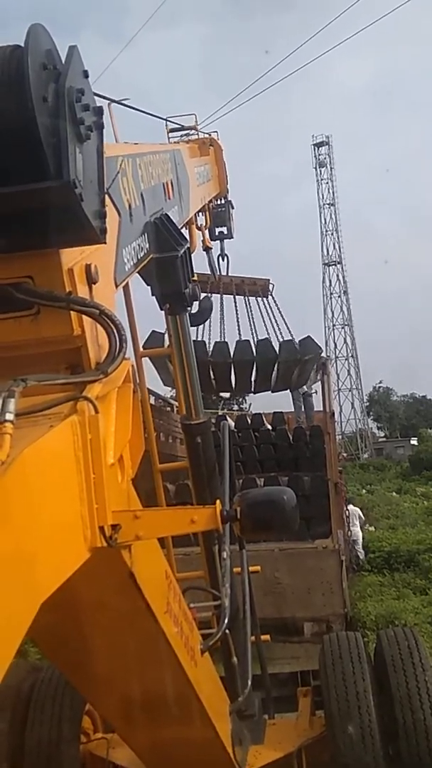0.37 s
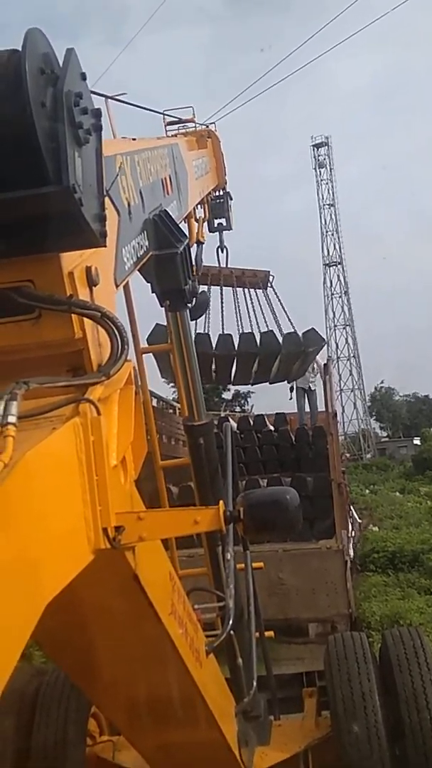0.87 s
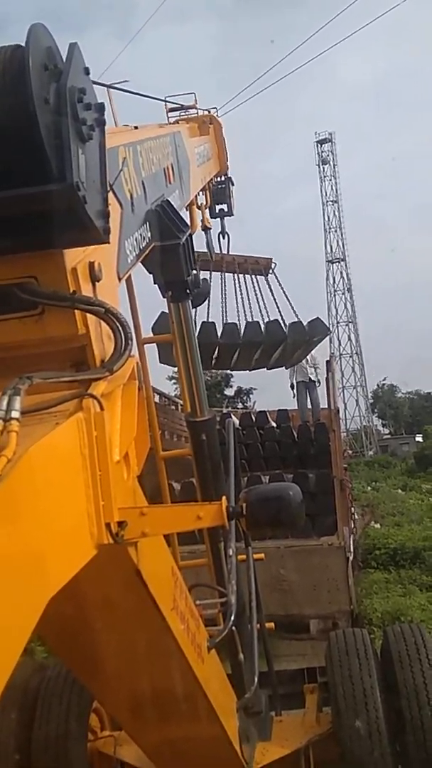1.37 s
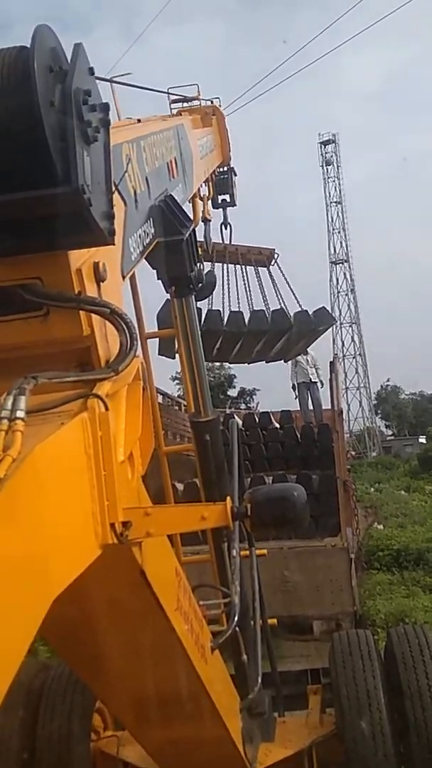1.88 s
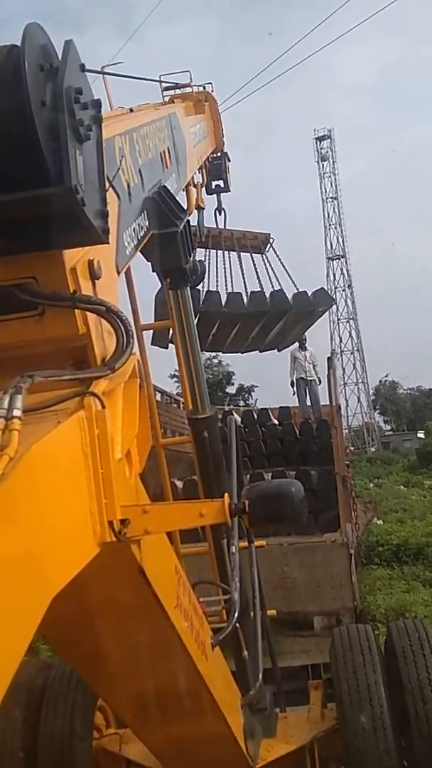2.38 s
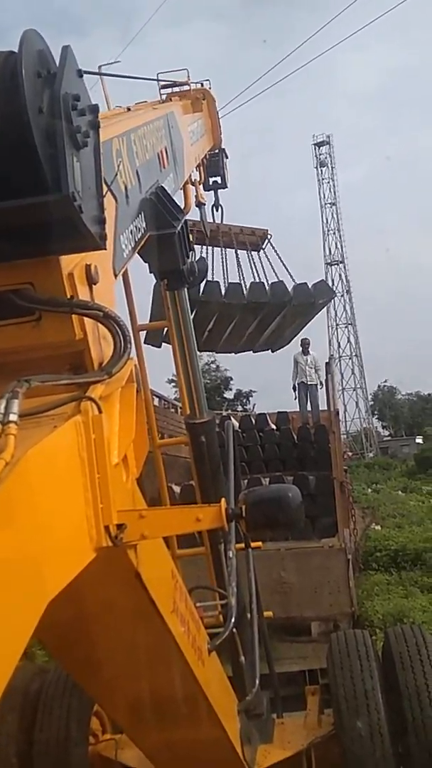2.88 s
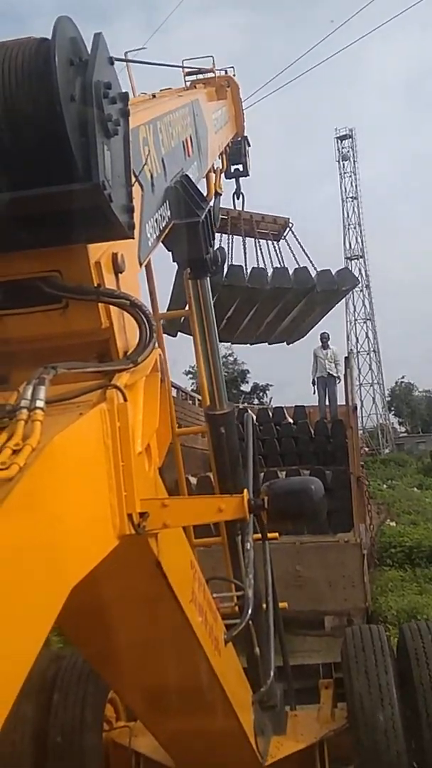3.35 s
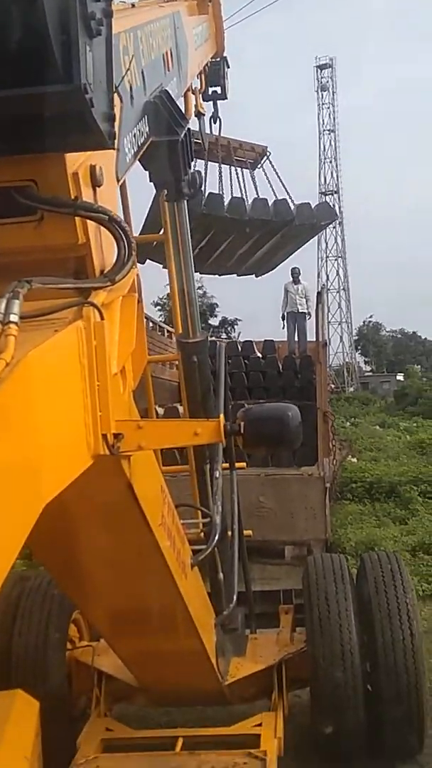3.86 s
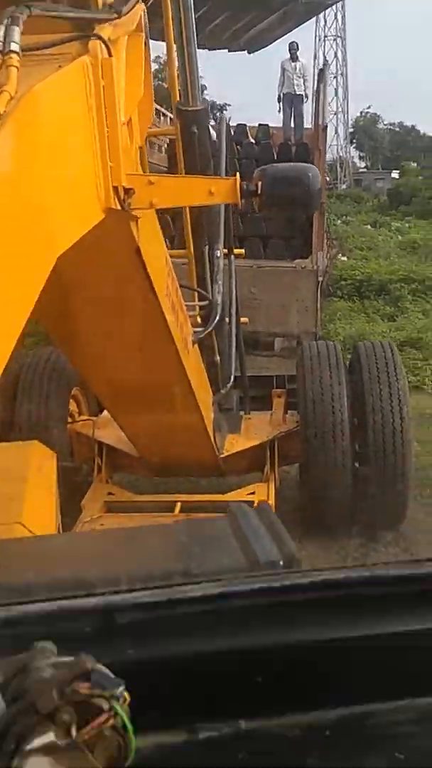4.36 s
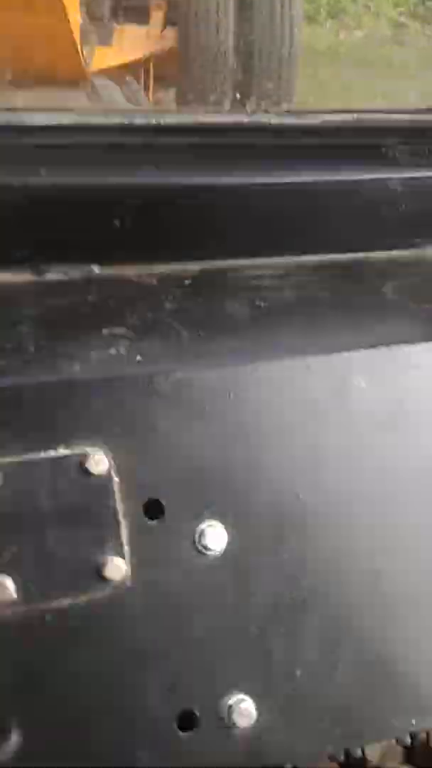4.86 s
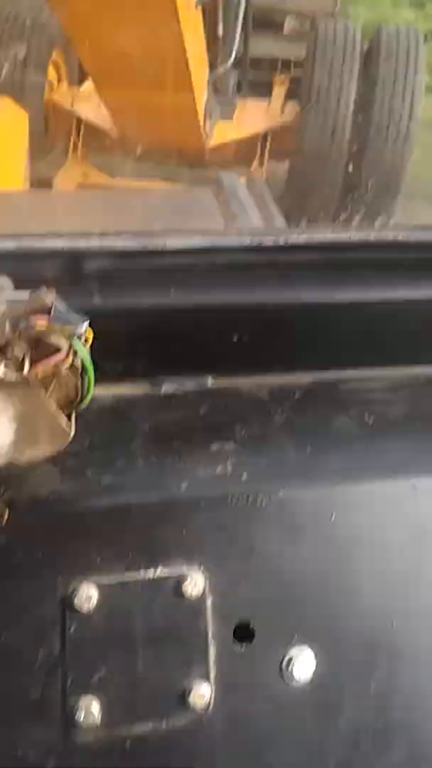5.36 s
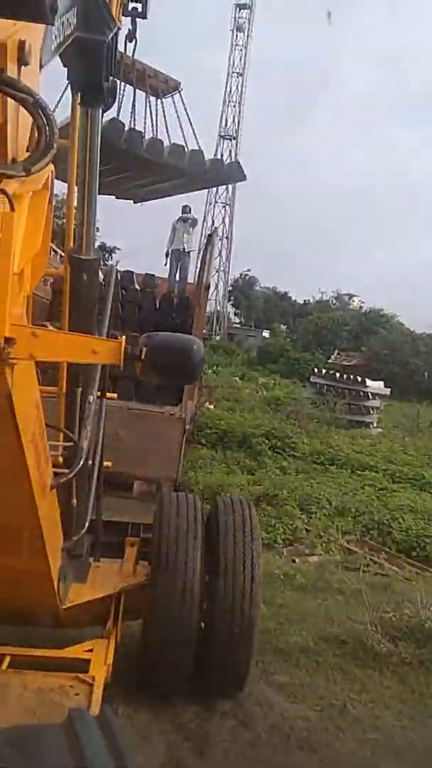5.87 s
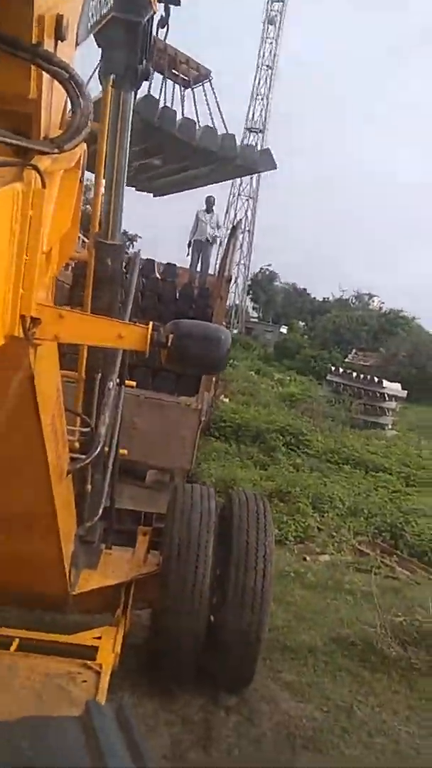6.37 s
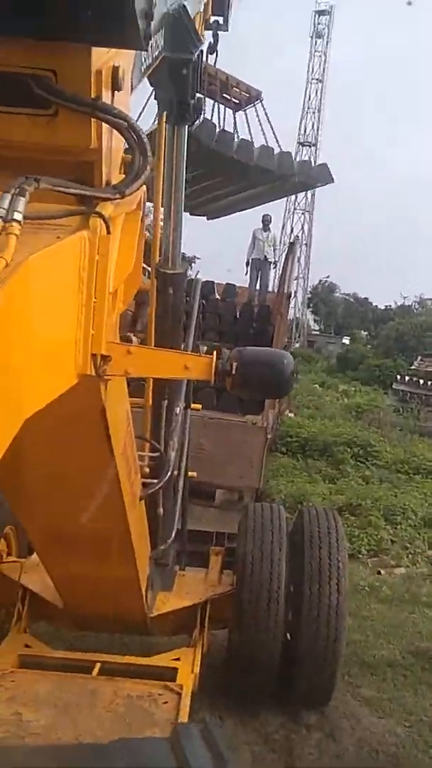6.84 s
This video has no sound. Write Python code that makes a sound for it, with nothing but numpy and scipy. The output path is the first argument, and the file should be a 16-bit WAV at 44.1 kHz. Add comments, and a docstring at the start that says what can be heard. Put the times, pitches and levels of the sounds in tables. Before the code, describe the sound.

Inside a working crane's cab, captured by a handheld stereo microphone. From 0 to 2.1 s a four-cylinder diesel runs loud and nearly constant at high revs: a dense low drone near 50 and 100 Hz, throbbing broadband roar, rattling panels and a hydraulic pump whine. At 2.1 s it eases slightly, then from 2.6 s the pitch plunges with a cab shudder, treble fading first, a clunk at 3.0 s, nearly stalling by 3.4-3.7 s into faint, separate knocks and tiny squeaks. Around 4.0-4.3 s bright air hisses burst out with thin high whistles, over a low thump; a cluster of metallic lever clunks follows at 4.3 s. The engine settles into a slow, soft, uneven clattering idle, rising slightly towards the end. Small squeaks near 5 s, a hard tick at 5.1 s, microphone scuffs and occasional panel bumps continue, with fine ticks around 6.2 s, until 7.2 s.

```python
"""A four-cylinder diesel crane works at high revs, drops to near stall and settles to a ticking idle, heard in the cab.
Engine: sine orders, block modes knocked by each firing, a chuff, shaken cab panels and throbbing broadband roar.
Gear pump: three near-sine tones, louder where they cross pipe and panel resonances.
Events: air hisses and whistles, lever clunks, ticks and squeaks of small parts, friction on the microphone.
The microphone is hand-held and has two ports, unequal in colour and arrival time."""
import sys
import numpy as np
from scipy import signal
from scipy.fft import rfft, irfft, next_fast_len
from scipy.io import wavfile

SR = 44100
rng = np.random.default_rng(int(sys.argv[2]) if len(sys.argv) > 2 else 0)


def attenuation_scalar(level_db):
    """Turn a level in dB into a linear amplitude multiplier (20 dB per decade)."""
    decades = np.asarray(level_db, float) / 20
    return 10 ** decades


def wav_out(sig):
    """Save sig, one row per channel (or a flat mono array), as 16-bit PCM at SR to the path in sys.argv[1]."""
    wavfile.write(sys.argv[1], SR, np.round(np.clip(np.atleast_2d(sig).T, -1, 1) * 32767).astype(np.int16))


N = 318841
TIME_S = np.arange(N) / SR

# engine speed: (time [s], firing rate [1/s])
FIRING_RATE = [(0, 52.05), (0.9, 52.38), (1.5, 52.35), (2.12, 52.15), (2.3, 50.6), (2.5, 50.1),
               (2.58, 48.5), (2.63, 45), (2.87, 33.8), (3.1, 27.6), (3.25, 23.0), (3.4, 14.76), (3.6, 11.0),
               (3.9, 13.51), (4.3, 16.26), (5.1, 15.99), (5.5, 18.25), (6.9, 18.3), (7.23, 20.13)]
WORKING_FIRINGS_PER_S = 52
# engine load as level of its orders: (time [s], level [dB])
ORDER_LOAD = [(0, -17), (2.1, -16.5), (2.25, -21), (2.56, -19.5), (2.63, -27), (3.05, -43), (3.3, -52.5),
              (3.5, -84)]
# strong engine tones: (multiple of firing rate [-], level re load [dB])
ENGINE_ORDERS = [(1, 2), (3, -24), (3.25, -7), (4, -12.5), (6, -6.5), (6.5, -20), (7, -0.5), (8, -16.5),
                 (9, -24.5), (9.5, -17.5), (11.75, -28), (12.25, -21.5)]
# exhaust boom at twice the firing rate: ceiling, and lead over the load below it
BOOM_MAX_DB, BOOM_OVER_LOAD_DB = -12.5, 8
# unequal cylinders, mean level of the other quarter orders: (multiple of firing rate [-], level re load [dB])
UNEVEN_ORDERS = [(.75, -39), (1.25, -16.5), (2.75, -15), (3.6, -21.5), (6.5, -16.5), (9, -27.5), (13, -49)]
UNEVEN_SPREAD_DB = 4.5

# gear pump tones: (multiple of firing rate [-], relative level [dB])
PUMP_TONES = [(5, 2.5), (10, -2.5), (15, -15)]
# pipes and panels set ringing by a passing pump tone: (centre [Hz], half width [Hz], level at centre [dB])
PUMP_RESONANCES = [(135, 33, -19.5), (170, 17, -19), (232.6, 3.5, -17), (326.8, 12, -15.5),
                   (507, 7.95, -15), (750, 15, -15.5)]
# drop-out of the upper pump tones: (start [s], end [s], loss [dB])
PUMP_UPPER_QUIET = [(2.97, 4.0, 10)]
PUMP_DB = -30.5  # at working speed, away from resonance
PUMP_STUTTER_DB_PER_DB = .9  # unsteadiness per dB of speed lost
STALL_S, STALL_DB_PER_S = 3.093, 123  # pump and floor rumble die away near stall
PUMP_STALL_FACTOR = 1.45  # pump decay rate over floor decay rate

# engine block modes, three lists (lower, upper, top): (centre [Hz], first-pass width [Hz], relative level [dB])
BLOCK_MODES = [
    [(1150, 120, 9), (1285, 57, 13), (1441, 49, 15.5), (1570, 112, 14.5)],
    [(1755, 28, 4.5), (1981, 66, 5.5), (2113, 132, 3.5), (2300, 170, 2.5), (2434, 220, -4.5),
     (3270, 710, -13.5)],
    [(3760, 160, 9), (6840, 1440, 1.5)],
]
# combustion clatter as level of the upper block modes: (time [s], level [dB])
CLATTER_LEVEL = [(0, -31.5), (2.4, -35), (2.95, -52), (3.2, -54.5), (3.4, -67), (3.44, -48), (3.55, -58.5),
                 (3.63, -70), (3.7, -70), (3.85, -52.5), (3.93, -84), (4.02, -47), (4.25, -40.5),
                 (4.36, -43), (4.6, -43), (4.68, -41), (4.8, -47.5), (5.05, -37.5), (5.27, -46),
                 (5.72, -41.5), (5.87, -48), (6.21, -39), (6.55, -46), (6.8, -44), (7.23, -44)]
# drop-out of the lower block modes: (start [s], end [s], loss [dB])
LOWER_MODES_QUIET = [(2.72, 3.7, 16), (4.47, 4.86, 7)]
# drop-out of the top block modes: (start [s], end [s], loss [dB])
TOP_MODES_QUIET = [(2.9, 3.97, 33)]
CLATTER_MEAN_DB, LOWER_AT_MEAN_DB, LOWER_DB_PER_DB = -40, -38, 0.87
TOP_UNDER_UPPER_DB, RING_LEVEL_SPREAD_DB = 16.5, 2.5
KNOCK_DELAY_FIRINGS = .05  # knock lags firing by this share of the firing interval
COAST_FROM_S, COAST_TO_S, COAST_FLOOR = 2.6, 3.4, 1.2  # without fuel the knocks melt into an even rattle
REPEAT_SHARE = 0.77  # noise power repeated every four-stroke cycle, at working speed
HOLLOW_LOW_HZ, HOLLOW_HIGH_HZ = 1060, 1526  # lost from all engine noise while the lower modes are quiet

# drop-out of the chuff: (start [s], end [s], loss [dB])
CHUFF_QUIET = [(3.0, 4.05, 14), (4.47, 4.86, 10)]
CHUFF_HZ, CHUFF_WIDTH_HZ = 752, 54
CHUFF_UPPER_HZ, CHUFF_UPPER_DB = 980, -11.5
CHUFF_UNDER_CLATTER_DB, CHUFF_MAX_DB = 2, -43.5

# cab panel resonances: (centre [Hz], width [Hz])
PANEL_MODES = [(57, 10.6), (175, 26), (335, 35), (485, 19.6)]
# panel drive, same row order: (level at work [dB], idle level over clatter [dB], share of clean thump [0-1])
PANEL_DRIVE = [(-47, 0, 0.14), (-32.5, -2.5, 0.1), (-27.5, -2, 0.25), (-35, -0.5, 0.14)]
# floor rumble spectrum: (frequency [Hz], relative density [dB per Hz])
RUMBLE_COLOUR = [(10, -28), (24, 9.5), (33, 4), (48, 12), (75, -11), (110, 10), (150, 6.5), (230, -6),
                 (600, -52)]
# cab shudders: (start [s], hold [s], level [dB], pitch [Hz])
SHUDDERS = [(2.567, .03, -22, 85), (2.623, 0.1, -12.5, 184), (2.596, 0.41, -24, 85),
            (2.794, 0.022, -16, 85), (3.126, 0.026, -38, 139), (3.24, 0.31, -45.5, 102),
            (4.065, 0.017, -27.5, 68), (4.132, 0.16, -13.5, 69), (4.179, 0.016, -16, 175),
            (4.274, 0.15, -22.5, 313), (4.364, 0.076, -38, 485), (4.566, 0.0072, -31, 322),
            (4.631, 0.11, -29.5, 56), (4.646, 0.029, -28.5, 310), (4.946, .02, -33, 60.4),
            (5.034, 0.029, -21, 85), (5.065, 0.11, -30.5, 450), (5.167, 0.03, -33, 175),
            (5.443, 0.097, -30, 335), (5.544, 0.098, -29, 310), (5.545, 0.01, -25, 70),
            (5.63, 0.2, -34, 485), (5.642, 0.12, -27.5, 175), (5.981, 0.036, -28, 335),
            (5.933, 0.25, -33, 175), (6.217, 0.29, -33, 485), (6.298, 0.19, -31.5, 170),
            (6.722, 0.065, -37, 335), (6.865, 0.033, -39, 338), (6.64, 0.026, -35, 500),
            (6.87, 0.17, -36.5, 500)]
# bands the cab hardly passes: (centre [Hz], width [Hz])
CAB_NOTCHES = [(685, 216), (935, 110)]
RUMBLE_HZ, RUMBLE_DB, RUMBLE_OVER_CLATTER_DB = 85, -21, -9
SHUDDER_DB_PER_OCTAVE, SHUDDER_RISE_DB_PER_S, SHUDDER_FALL_DB_PER_S = 17, 361, 178
CAB_CLATTER_MAX_DB = -22.5  # louder clatter shakes the cab no harder
CAB_FLOOR_DB, CAB_FLOOR_DB_PER_OCTAVE = -51.5, -5.5  # quietest remainder at RUMBLE_HZ, and its slope

# roar spectrum: (frequency [Hz], relative density [dB per Hz])
ROAR_COLOUR = [(350, -46.5), (600, 6.5), (688, -6), (767, 0), (929, -1.5), (1420, 2), (1860, -2.5),
               (2350, -4.5), (4650, -18), (6030, -17), (11100, -26), (12100, -26), (15700, -39)]
ROAR_DB, ROAR_DB_PER_DB = -22.5, 4  # at working speed; loss per dB of speed lost
DULL_BELOW_DB, DULL_DB_PER_DB = -4.5, 13  # extra treble loss under this relative speed
ROAR_QUIET_SHARE = 0.025  # share of the lower-mode drop-outs

# blow-offs of air: (start [s], hold [s], level [dB])
BLOWS = [(3.732, 0.043, -38.5), (3.794, 0.047, -55), (3.989, 0.2, -27), (4.214, 0.099, -28),
         (7.138, 0.16, -55.5)]
# whistles in the jet: (start [s], hold [s], level [dB], pitch [Hz])
WHISTLES = [(4.075, 0.045, -34, 4840), (4.1, 0.059, -26, 7140), (4.205, .025, -29, 7200)]
# jet spectrum: (frequency [Hz], relative density [dB per Hz])
AIR_COLOUR = [(880, 5), (1500, -20), (2050, 6.5), (4120, 1), (4370, 1), (6050, 6.5), (6610, 4), (7140, 13),
              (7580, 13), (8690, 10.5), (15700, 4.5)]
# broad jet resonances: (centre [Hz], width [Hz])
JET_RESONANCES = [(2300, 3200), (4600, 370), (5400, 800), (6050, 410), (8950, 730), (9940, 290),
                  (11100, 620), (13000, 2100)]
BLOW_RISE_DB_PER_S, BLOW_FALL_DB_PER_S = 654, 793
WHISTLE_RISE_DB_PER_S, WHISTLE_FALL_DB_PER_S = 315, 317

# lever clunks: (time [s], ring drive [dB], rattle level [dB])
CLUNKS = [(2.982, -29, -25), (4.283, -35, -34), (4.31, -24, -25), (4.338, -33, -33), (4.366, -35, -42),
          (4.879, -39.5, -51)]
# lever modes: (frequency [Hz], level re ring drive [dB], t60 [s])
LEVER_MODES = [(336, 8.5, 0.059), (524, 2.5, 0.13), (875, 1, 0.29), (985, -2.5, 0.33), (1225, -3, 0.091),
               (1746, 2, 0.1), (2160, -7, 0.027), (2430, -5, 0.091), (3850, -7.5, 0.13), (4950, -13.5, 0.1),
               (6718, -28, .07), (8100, -17.5, .06)]
# dry ticks: (time [s], drive [dB], pitch [Hz], fizz re drive [dB])
TICKS = [(2.9801, -22, 2400, -15), (4.283, -11, 330, -20), (4.308, -11, 900, -12), (5.081, -6.5, 1500, -30),
         (5.0811, -19, 9000, -30), (5.15, -24, 10000, -20), (5.2895, -19, 2800, -28),
         (5.968, -29, 6600, -13), (6.124, -36, 7000, -6), (6.232, -17, 6000, -6)]
TICK_FIZZ_T60_S = .12
# squeaks and rings of loose parts: (start [s], hold [s], level [dB], pitch [Hz])
SQUEAKS = [(3.05, 0.25, -58.5, 950), (3.41, 0.11, -60, 2080), (3.512, 0.05, -55, 2380),
           (3.683, 0.045, -49.5, 1985), (3.78, 0.047, -44.5, 2085), (3.527, 0.029, -60.5, 750),
           (3.777, 0.016, -48, 855), (3.835, 0.022, -47.5, 750), (3.966, 0.02, -40.5, 780),
           (4.625, 0.035, -44, 1420), (4.686, 0.04, -41.5, 1414), (4.806, .012, -47, 2050),
           (4.884, 0.02, -45, 1430), (4.96, 0.069, -38.5, 1150), (5.042, 0.14, -37, 1365),
           (6.187, 0.12, -39.5, 1570), (6.743, 0.18, -43, 1570), (6.94, 0.067, -43, 1570)]
SQUEAK_WIDTH_HZ, SQUEAK_RISE_DB_PER_S, SQUEAK_FALL_DB_PER_S = 59, 4000, 396

# rubs at the microphone: (start [s], hold [s], level [dB])
RUBS = [(4.125, 0.12, -39), (4.305, 0.02, -25.5), (4.392, 0.076, -43), (4.897, 0.28, -48.5),
        (5.097, 0.049, -28.5), (5.169, 0.016, -34), (5.272, 0.01, -39.5), (5.327, 0.03, -37.5),
        (5.53, 0.26, -46), (6.024, 0.34, -53)]
# friction spectrum, also used for lever rattle: (frequency [Hz], relative density [dB per Hz])
RUB_COLOUR = [(290, 3.5), (500, -2.5), (816, 3.5), (877, 0.5), (1500, 1), (2510, -4.5), (3400, -7),
              (10900, -21), (15700, -31)]
RUB_RISE_DB_PER_S, RUB_FALL_DB_PER_S = 502, 331

# likeness of noise at the two ports: (frequency [Hz], likeness [0-1])
PORT_LIKENESS = [(60, 0.85), (125, .5), (250, .6), (500, .5), (1000, 0.15), (2000, 0.25), (4000, 0.2),
                 (12000, 0.2)]
# port colour: (frequency [Hz], left minus right [dB])
PORT_COLOUR = [(60, -1), (110, 0.5), (200, -1), (380, 1), (700, 1.5), (1290, 4), (2380, 12), (4400, -2.5),
               (8120, -1), (15000, 2)]
# balance as the microphone turns: (time [s], left minus right [dB])
MICROPHONE_TURN = [(0, 1), (2, 1.5), (2.7, 3.5), (3.2, 8), (4, 4), (5, 6.5), (6, 3.5), (7.23, 6.5)]
PORT_LAG_S, BASS_LEAD_RAD = 0.000331, 0.35


def curve(rows):
    """Read a two-column time table at every sample."""
    s, values = np.transpose(rows)
    return np.interp(TIME_S, s, values)


def rms_one(x):
    """Scale to unit rms."""
    return x / np.sqrt(np.mean(x ** 2) + 1e-20)


def at_hz(points, hz):
    """Read a spectrum on a log-frequency axis."""
    table_hz, values = np.transpose(points)
    return np.interp(np.log(np.maximum(hz, 1)), np.log(table_hz), values)


def drift(rate_hz):
    """Slow random signal of unit rms: noise through two equal low-pass poles, at one value per 40 samples."""
    r = np.exp(-80 * np.pi * rate_hz / SR)
    white = rng.standard_normal(N // 40 + 2002)
    slow = signal.lfilter([1], [1, -2 * r, r * r], white)[2000:]
    return np.interp(np.arange(N) / 40, np.arange(len(slow)), rms_one(slow))


def resonate(x, hz, width_hz):
    """Two-pole resonance, gain 1 on top."""
    r = np.exp(-np.pi * width_hz / SR)
    poles = [1, -2 * r * np.cos(2 * np.pi * hz / SR), r * r]
    return signal.lfilter(np.array([1, 0, -1]) * (1 - r * r) / 2, poles, x)


def flat(hz):
    """White spectrum."""
    return np.ones_like(hz)


def field(gain, firings=None):
    """Unit-rms two-port noise coloured by gain(hz), most alike in the bass; firings make part repeat per cycle."""
    size = next_fast_len(N)
    hz = np.arange(size // 2 + 1) * SR / size
    alike = np.clip(at_hz(PORT_LIKENESS, hz), 0, 1)
    white = rng.standard_normal((2, N))
    if firings is not None:
        cycle_index = (firings % 4 * SR / WORKING_FIRINGS_PER_S).astype(int)
        cycle = white[:, cycle_index]
        share = np.clip(REPEAT_SHARE * attenuation_scalar(revs_db()), 0, 1)
        white = np.sqrt(1 - share) * white + np.sqrt(share) * cycle
    mid, side = rfft(white, size)
    pair = np.sqrt(1 + alike) * mid + np.sqrt(1 - alike) * side * [[1], [-1]]
    return rms_one(irfft(pair * gain(hz), size)[:, :N])


def bursts(turns, decay, floor, spread_db):
    """Unit-rms envelope that jumps at each whole turn, with random strength, and decays over a share of it."""
    strength = attenuation_scalar(spread_db * rng.standard_normal(600))[turns.astype(int)]
    jumps = strength * np.exp(-(turns % 1) / decay)
    smooth = signal.lfilter([.02], [1, -.98], jumps)
    return rms_one(floor + smooth)


def swells(s, hold_s, db, rise_db_per_s, fall_db_per_s):
    """Gain of events that rise, hold and fall at steady dB rates; their powers add."""
    t = np.arange(0, N, 40)[:, None] / SR
    level_db = db - rise_db_per_s * np.maximum(s - t, 0) - fall_db_per_s * np.maximum(t - s - hold_s, 0)
    return np.interp(TIME_S, t[:, 0], np.sqrt(np.sum(attenuation_scalar(2 * level_db), 1)))


def revs_db():
    """Speed re working speed."""
    return 20 * np.log10(curve(FIRING_RATE) / WORKING_FIRINGS_PER_S)


def stall_db():
    """Loss growing steadily from the moment the engine nears stall."""
    return -STALL_DB_PER_S * np.maximum(TIME_S - STALL_S, 0)


def quiet_db(spells):
    """Loss that sets in over 0.14 s and lifts in 8 ms."""
    loss = 0
    for start_s, end_s, loss_db in spells:
        depth = np.minimum((TIME_S - start_s) / 0.14, (end_s - TIME_S) / 0.008)
        loss = loss - loss_db * np.clip(depth, 0, 1)
    return loss


def order_tone(order, level_db, firings):
    """Near sine locked to the firings, level wavering slightly; fractional orders start at random phase."""
    phase = 2 * np.pi * order * firings - .3 * order * order
    phase = phase + 2 * np.pi * rng.random() * (order % 1 > 0)
    return np.sqrt(2) * attenuation_scalar(level_db + 0.56 * drift(21.0)) * np.cos(phase)


def engine_orders(firings):
    """Periodic firing forces give harmonics; unequal cylinders add faint quarter orders."""
    load_db = curve(ORDER_LOAD)
    boom_db = np.minimum(BOOM_MAX_DB, load_db + BOOM_OVER_LOAD_DB)
    out = order_tone(2, boom_db, firings)
    for order, db in ENGINE_ORDERS:
        out = out + order_tone(order, db + load_db, firings)
    taken = [2] + [order for order, db in ENGINE_ORDERS + PUMP_TONES]
    for order in np.arange(3, 53) / 4:
        if order not in taken:
            db = at_hz(UNEVEN_ORDERS, order) + UNEVEN_SPREAD_DB * rng.standard_normal()
            out = out + order_tone(order, db + load_db, firings)
    return out


def engine_noise(firings):
    """Each firing knocks the block modes; ring levels vary randomly."""
    coasting = COAST_FLOOR * (TIME_S > COAST_FROM_S) * (TIME_S < COAST_TO_S)
    knocking = bursts(firings - KNOCK_DELAY_FIRINGS, decay=.33, floor=.33 + coasting, spread_db=1.5)
    drive = knocking * field(flat, firings)
    upper_db = curve(CLATTER_LEVEL)
    lower_db = LOWER_AT_MEAN_DB + LOWER_DB_PER_DB * (upper_db - CLATTER_MEAN_DB) + quiet_db(LOWER_MODES_QUIET)
    top_db = upper_db - TOP_UNDER_UPPER_DB + quiet_db(TOP_MODES_QUIET)
    out = 0
    for modes, level_db in zip(BLOCK_MODES, [lower_db, upper_db, top_db]):
        rings = 0
        for hz, width_hz, db in modes:
            ring = resonate(resonate(drive, hz, width_hz), hz, 2 * width_hz)
            rings = rings + attenuation_scalar(db + RING_LEVEL_SPREAD_DB * drift(12.7)) * ring
        out = out + attenuation_scalar(level_db) * rms_one(rings)
    return out


def chuff(firings):
    """One puff per four firings, decaying then shut off, through two resonances."""
    cycle = firings / 4 % 1
    gate = 0.028 + (cycle < .55) * np.exp(-cycle / 0.23)
    puff = signal.lfilter([.003], [1, -.997], gate) * field(flat)
    lower = resonate(resonate(puff, CHUFF_HZ, CHUFF_WIDTH_HZ), CHUFF_HZ, 2 * CHUFF_WIDTH_HZ)
    upper = resonate(resonate(puff, CHUFF_UPPER_HZ, CHUFF_WIDTH_HZ), CHUFF_UPPER_HZ, CHUFF_WIDTH_HZ)
    level_db = np.minimum(curve(CLATTER_LEVEL) - CHUFF_UNDER_CLATTER_DB, CHUFF_MAX_DB) + quiet_db(CHUFF_QUIET)
    return attenuation_scalar(level_db) * rms_one(lower + attenuation_scalar(CHUFF_UPPER_DB) * upper)


def gear_pump(firings):
    """Ten-tooth meshing tones, boosted where they cross a resonance, unsteady as speed falls."""
    speed, revs = curve(FIRING_RATE), revs_db()
    out = 0
    for order, db in PUMP_TONES:
        power = attenuation_scalar(2 * (PUMP_DB + 0.93 * revs))
        for hz, half_hz, top_db in PUMP_RESONANCES:
            detuning = (order * speed - hz) / half_hz
            power = power + attenuation_scalar(2 * top_db) / (1 + detuning ** 2) ** 2
        level_db = db + 10 * np.log10(power) + PUMP_STALL_FACTOR * stall_db()
        level_db = level_db + PUMP_STUTTER_DB_PER_DB * revs * drift(36)
        if order > 5:
            level_db = level_db + quiet_db(PUMP_UPPER_QUIET)
        out = out + order_tone(order, level_db, firings)
    return out


def cab_gain(hz, work_db, over_clatter_db):
    """Power sum of work level, clatter-driven level, shudders near this pitch and a quiet remainder."""
    s, hold_s, shudder_db, centre_hz = np.transpose(SHUDDERS)
    near_db = shudder_db - SHUDDER_DB_PER_OCTAVE * np.abs(np.log2(centre_hz / hz))
    jolts = swells(s, hold_s, near_db, SHUDDER_RISE_DB_PER_S, SHUDDER_FALL_DB_PER_S)
    idle_db = np.minimum(curve(CLATTER_LEVEL), CAB_CLATTER_MAX_DB) + quiet_db(LOWER_MODES_QUIET) / 2
    rest_db = CAB_FLOOR_DB + CAB_FLOOR_DB_PER_OCTAVE * np.log2(hz / RUMBLE_HZ)
    return np.sqrt(attenuation_scalar(2 * work_db) + attenuation_scalar(2 * (idle_db + over_clatter_db)) + jolts ** 2 + attenuation_scalar(2 * rest_db))


def cab_panels(firings):
    """Firings excite panel resonances with noise bursts and clean thumps."""
    turn = np.maximum(firings - KNOCK_DELAY_FIRINGS, 0).astype(int)
    shake = bursts(firings, decay=.6, floor=.8, spread_db=2.0)
    out = 0
    for (hz, width_hz), (work_db, over_db, clean) in zip(PANEL_MODES, PANEL_DRIVE):
        noise = shake * field(lambda f: 1 / (1 + ((f - hz) / (10.0 * width_hz)) ** 2))
        impulses = np.diff(turn, prepend=0) * attenuation_scalar(2.0 * rng.standard_normal(600))[turn]
        thumps = resonate(impulses + 1e-18, hz, 2.5 * width_hz)
        drive = np.clip(1 - clean, 0, 1) * noise + clean * rms_one(thumps)
        gain = cab_gain(hz, work_db + ROAR_DB_PER_DB * revs_db(), over_db)
        out = out + gain * rms_one(resonate(drive, hz, width_hz))
    return out


def floor_rumble():
    """Low coloured noise of the cab floor, swelling with the shudders."""
    gain = cab_gain(RUMBLE_HZ, RUMBLE_DB + stall_db(), RUMBLE_OVER_CLATTER_DB)
    return gain * field(lambda hz: attenuation_scalar(at_hz(RUMBLE_COLOUR, hz)))


def roar(firings):
    """Noise throbbing at injection and exhaust, twice a firing, and per crank turn; duller as revs fall."""
    level_db = ROAR_DB + ROAR_DB_PER_DB * revs_db() + ROAR_QUIET_SHARE * quiet_db(LOWER_MODES_QUIET)
    treble_db = DULL_DB_PER_DB * np.minimum(revs_db() - DULL_BELOW_DB, 0)
    throb = bursts(firings, decay=.6, floor=.6, spread_db=3.0)
    throb = throb + 1.3 * bursts(2 * firings, decay=.45, floor=.35, spread_db=1.5)
    throb = rms_one(throb * (1 + 0.12 * np.cos(np.pi * firings)))
    noise = throb * field(lambda hz: attenuation_scalar(at_hz(ROAR_COLOUR, hz)), firings)
    body = signal.sosfiltfilt(signal.butter(5, 3400, fs=SR, output="sos"), noise)
    return attenuation_scalar(level_db) * (body + attenuation_scalar(treble_db) * (noise - body))


def notched(x):
    """Take out the bands the cab hardly passes."""
    for hz, width_hz in CAB_NOTCHES:
        x = x - resonate(x, hz, width_hz)
    return x


def hollowed(x):
    """Cut the lower-mode band during the quiet spells of those modes."""
    band = signal.butter(2, [HOLLOW_LOW_HZ, HOLLOW_HIGH_HZ], "band", fs=SR, output="sos")
    return x - (1 - attenuation_scalar(quiet_db(LOWER_MODES_QUIET))) * signal.sosfiltfilt(band, x)


def air_valve():
    """Jet noise with several broad resonances, unsteady in strength, plus thin wavering whistles."""
    base = field(lambda hz: attenuation_scalar(at_hz(AIR_COLOUR, hz)))
    jet = 0.23 * base
    for hz, width_hz in JET_RESONANCES:
        jet = jet + attenuation_scalar(5.7 * drift(6.3)) * resonate(base, hz, width_hz)
    out = swells(*np.transpose(BLOWS), BLOW_RISE_DB_PER_S, BLOW_FALL_DB_PER_S) * rms_one(jet)
    for s, hold_s, db, hz in WHISTLES:
        pitch_hz = hz * (1 + .002 * drift(30))
        tone = np.sqrt(2) * np.cos(2 * np.pi * np.cumsum(pitch_hz) / SR)
        gain = swells(s, hold_s, db, WHISTLE_RISE_DB_PER_S, WHISTLE_FALL_DB_PER_S)
        out = out + gain * attenuation_scalar(3.3 * drift(40)) * tone
    return out


def lever_clunks():
    """Blows ring the lever modes, with new strengths each time, over a short noise rattle."""
    s, ring_db, rattle_db = np.transpose(CLUNKS)
    at = (s * SR).astype(int)
    luck = rng.standard_normal((len(at), len(LEVER_MODES)))
    clicks, out = np.full(N, 1e-18), 0
    for k, (hz, level_db, t60_s) in enumerate(LEVER_MODES):
        clicks[at] = attenuation_scalar(ring_db + level_db + 2.0 * luck[:, k])
        r, w = attenuation_scalar(-60 / (t60_s * SR)), 2 * np.pi * hz / SR
        out = out + signal.lfilter([0, np.sin(w)], [1, -2 * r * np.cos(w), r * r], clicks)
    clicks[at] = attenuation_scalar(rattle_db)
    rattle = signal.lfilter([1], [1, -attenuation_scalar(-60 / (.15 * SR))], clicks)
    return out + rattle * field(lambda hz: attenuation_scalar(at_hz(RUB_COLOUR, hz)))


def ticks():
    """Broadly damped swing and short fizz at one pitch; the swing is offset to cancel the port lag."""
    white, half_lag = field(flat), int(PORT_LAG_S * SR / 2)
    out = 0
    for s, drive_db, hz, fizz_db in TICKS:
        click = np.full(N, 1e-18)
        click[int(s * SR)] = attenuation_scalar(drive_db)
        fizz = attenuation_scalar(fizz_db) * signal.lfilter([1], [1, -attenuation_scalar(-60 / (TICK_FIZZ_T60_S * SR))], click)
        swing = 15000 / hz * np.array([np.roll(click, half_lag), np.roll(click, -half_lag)])
        out = out + resonate(resonate(swing + fizz * white, hz, 1.0 * hz), hz, 0.8 * hz)
    return out


def squeaks(firings):
    """Noise through a narrow resonance, twice; every firing jolts it afresh."""
    jolts = bursts(firings - KNOCK_DELAY_FIRINGS, decay=.6, floor=.5, spread_db=2.0)
    drive, out = jolts * field(flat), np.zeros((2, N))
    for s, hold_s, db, hz in SQUEAKS:
        span = slice(int((s - .1) * SR), int((s + hold_s + .2) * SR))
        ring = resonate(resonate(drive[:, span], hz, SQUEAK_WIDTH_HZ), hz, 2 * SQUEAK_WIDTH_HZ)
        gain = swells(s, hold_s, db, SQUEAK_RISE_DB_PER_S, SQUEAK_FALL_DB_PER_S)
        out[:, span] += gain[span] * rms_one(ring)
    return out


def microphone_rubs():
    """Friction noise with a fast random level for grain."""
    strokes = swells(*np.transpose(RUBS), RUB_RISE_DB_PER_S, RUB_FALL_DB_PER_S)
    return strokes * attenuation_scalar(3.0 * drift(160)) * field(lambda hz: attenuation_scalar(at_hz(RUB_COLOUR, hz)))


def scene():
    """All sources at the two ports."""
    firings = np.cumsum(curve(FIRING_RATE)) / SR
    structure = engine_noise(firings) + chuff(firings) + cab_panels(firings) + floor_rumble()
    noise = hollowed(roar(firings) + notched(structure))
    machine = engine_orders(firings) + gear_pump(firings) + noise
    parts = lever_clunks() + ticks() + squeaks(firings)
    return machine + air_valve() + parts + microphone_rubs()


def top_cut(x):
    """Nothing passes above the cut-off."""
    return signal.sosfilt(signal.butter(12, 15820, fs=SR, output="sos"), x)


def record(dry):
    """Ports differ in colour, the right one lags, the balance turns; peaks are rounded."""
    size = next_fast_len(N + SR // 10)
    hz = np.arange(size // 2 + 1) * SR / size
    side = np.array([[1], [-1]])  # left, right
    lead_rad = 2 * np.pi * hz * PORT_LAG_S + BASS_LEAD_RAD * np.exp(-hz / 200)
    ports = attenuation_scalar(side * at_hz(PORT_COLOUR, hz) / 2) * np.exp(.5j * side * lead_rad)
    wet = irfft(rfft(dry, size) * ports, size)[:, :N]
    turned = wet * attenuation_scalar(side * curve(MICROPHONE_TURN) / 2)
    rounded = .95 * np.tanh(turned / .95)
    return top_cut(rounded)


dry = scene()
out = record(dry)
wav_out(out)
```